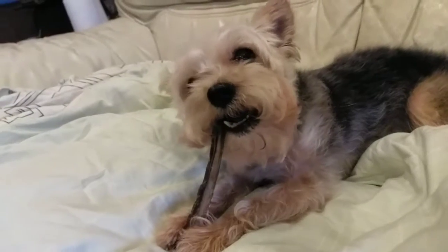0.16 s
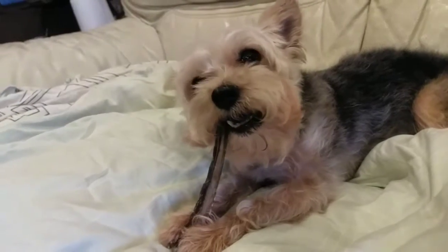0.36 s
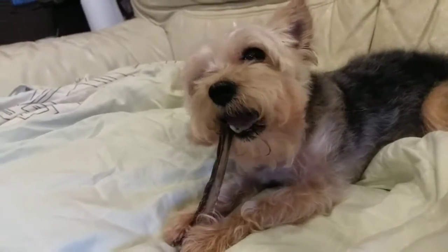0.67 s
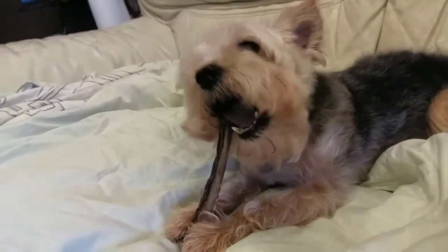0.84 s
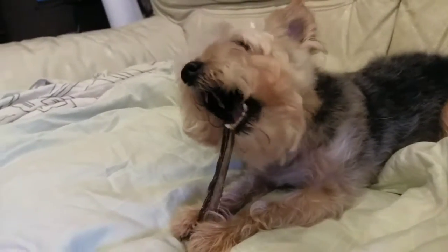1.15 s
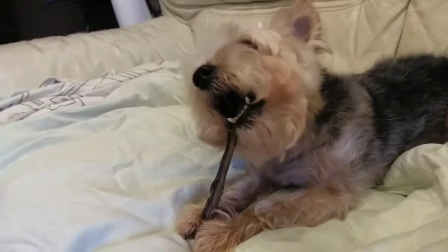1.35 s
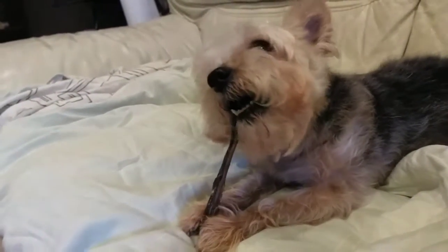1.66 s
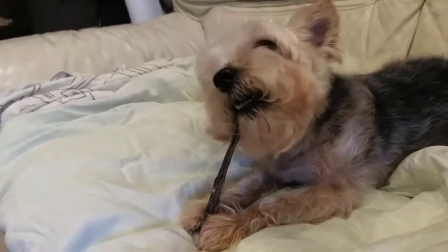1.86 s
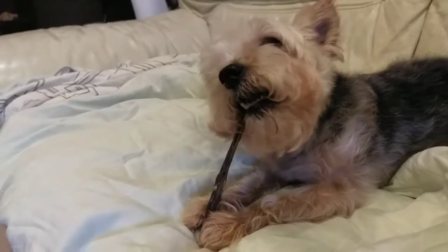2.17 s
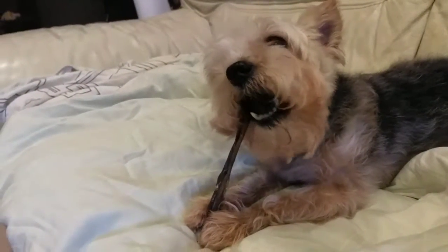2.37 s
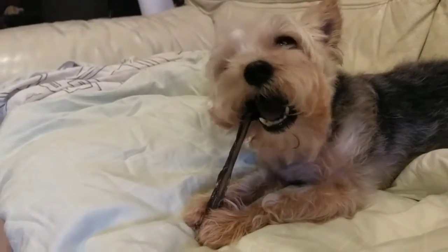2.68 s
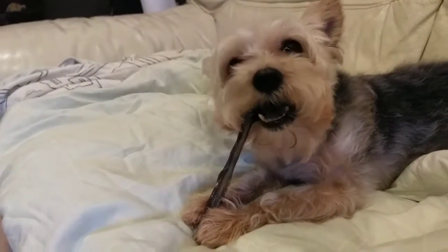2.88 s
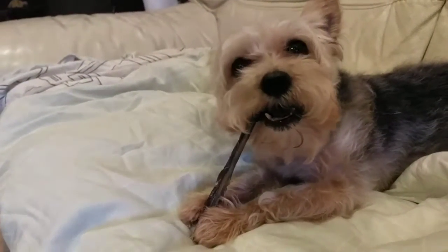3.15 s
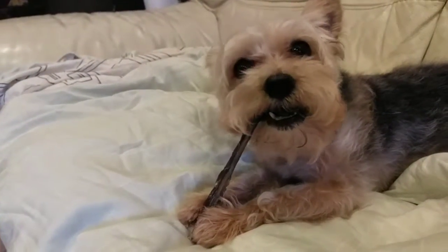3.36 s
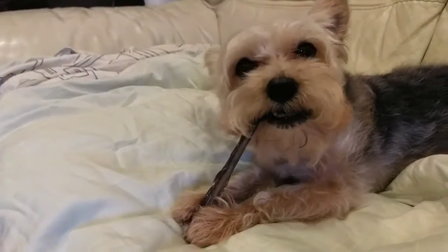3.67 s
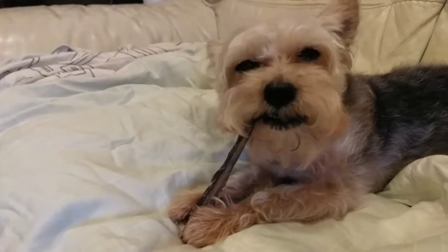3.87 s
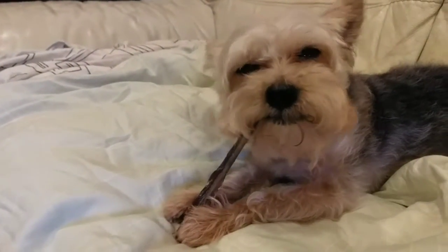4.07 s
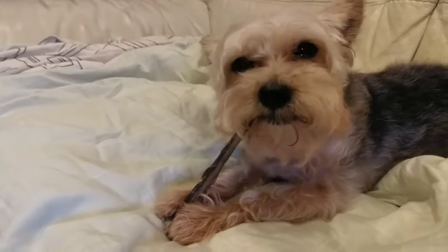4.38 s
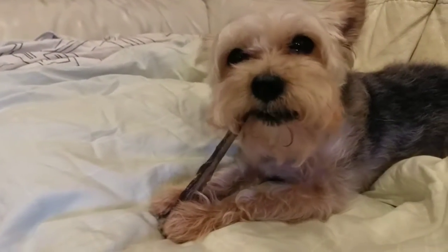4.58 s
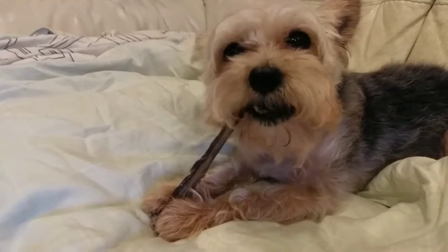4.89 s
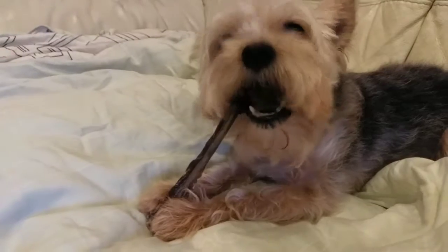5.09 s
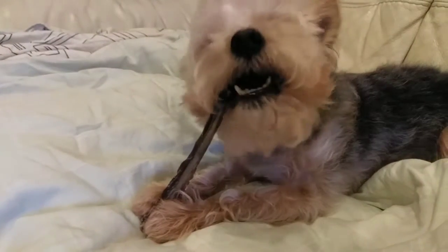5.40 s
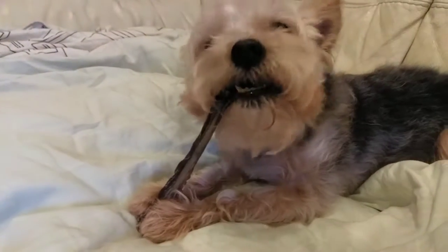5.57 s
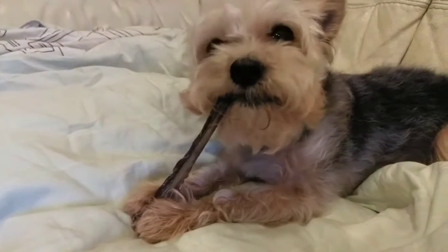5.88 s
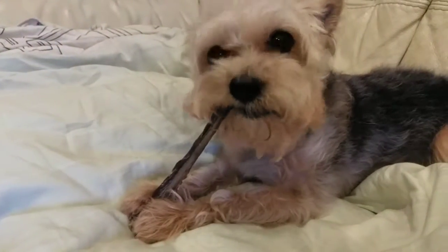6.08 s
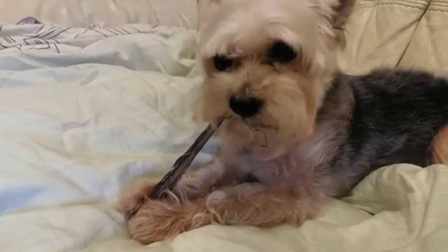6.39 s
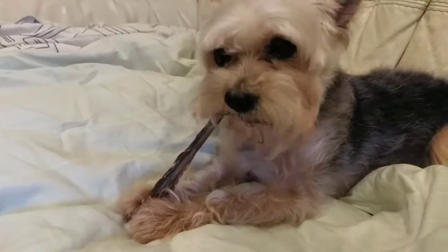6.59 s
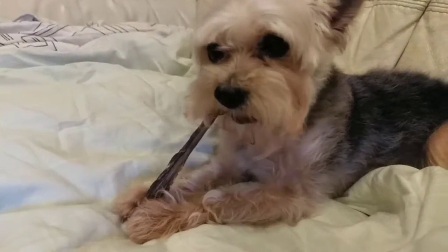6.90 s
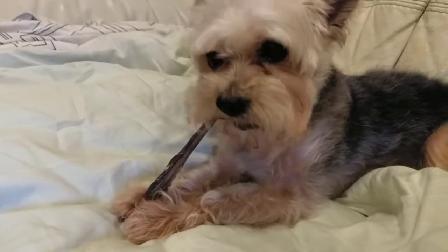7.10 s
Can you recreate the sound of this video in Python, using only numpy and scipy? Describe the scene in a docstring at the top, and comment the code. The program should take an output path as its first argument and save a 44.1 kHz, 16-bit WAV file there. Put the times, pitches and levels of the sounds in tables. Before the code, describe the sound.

A small dog gnaws a hard dried chew close to the microphones in a quiet, lively room. A tight cluster of brittle cracks comes first, then a spaced second bout, then a small third one. Wet lip clicks and saliva crackle run between. A single dry tick falls on the left. Faint hiss, low hum and a thin high whine lie beneath.

```python
"""A small dog gnaws a dried chew stick on a bed in a quiet, live room, close to two microphones.
Its teeth crack the stick in three bouts: each crack is a short ring, a dull knock with a thud, a harder clack
and a splintering snap, built from damped modes and noise, with scatter nearby and a room tail.
Wet mouth crackle made of random pops runs throughout and swells in smacks; one dry tick falls near the left
microphone; shaped noise makes a faint hiss and hum, and a thin electrical whine lies over them."""
import sys
import numpy as np
from scipy import signal
from scipy.fft import rfft, irfft, next_fast_len
from scipy.io import wavfile

SR = 44100
rng = np.random.default_rng(int(sys.argv[2]) if len(sys.argv) > 2 else 0)


def log_audio(samples):
    """Write samples as a 16-bit WAV file to the path given in sys.argv[1]."""
    # one column per channel
    frames = np.atleast_2d(samples).T
    # limit to full scale, then quantise
    limited = np.clip(frames, -1, 1)
    pcm = np.round(limited * 32767).astype(np.int16)
    wavfile.write(sys.argv[1], SR, pcm)


N = 319680

# broad colour of the breaking surface: f/Hz, relative level/dB
SNAP_COLOUR = [(1500, -4), (3200, -2), (4400, -21), (5100, 1), (6000, 3), (7500, 11), (8900, 8.5),
               (9700, -10), (11000, -45)]


def amp(db):
    """Decibels to gain."""
    return 10 ** (np.asarray(db) / 20)


def unit(x):
    """Scale to rms 1."""
    return x / np.sqrt(np.mean(x ** 2) + 1e-20)


def along(points, hz):
    """Interpolate (f/Hz, value) points on a log frequency axis."""
    f, v = np.transpose(points)
    return np.interp(np.log(hz + 1), np.log(f + 1), v)


def filtered(x, response):
    """x times a response of frequency, zero-padded against wrap-around."""
    n = x.shape[-1]
    m = next_fast_len(n + 4096)
    return irfft(rfft(x, m) * response(np.fft.rfftfreq(m, 1 / SR)), m)[..., :n]


def coloured(x, spectrum):
    """x through a zero-phase (f/Hz, gain/dB) spectrum."""
    return filtered(x, lambda hz: amp(along(spectrum, hz)))


def narrow(hz, width_hz):
    """A wavering tone: narrow noise of rms 1."""
    return unit(filtered(rng.standard_normal(N), lambda f: 1 / (1 + ((f - hz) / width_hz) ** 2)))


def add(track, s, sound):
    """Mix a stereo sound into the track at time s."""
    part = track[:, max(round(s * SR), 0):][:, :sound.shape[-1]]
    part += sound[:, :part.shape[-1]]


def later(x, lag_s=0.00032):
    """Sound reaches the right microphone a moment after the left."""
    return filtered(x, lambda hz: np.exp(-2j * np.pi * hz * lag_s))


def background(hiss_db=-48.0, tilt_db=0.65, hum_db=-55.5):
    """Steady air noise, its left-right likeness set per frequency, and a low wavering hum."""
    # air noise colour: f/Hz, relative level/dB per Hz
    hiss_colour = [(20, 4), (55, -5), (100, -9.5), (300, -11), (450, -12.5), (580, -16.5), (760, -11.5),
                   (1000, -17.5), (1350, -13), (1650, -19.5), (2150, -5.5), (2600, -21), (3400, -39.5),
                   (4400, -38.5), (8700, -38.5), (10000, -42), (11000, -60)]
    # left-right likeness of the air noise: f/Hz, correlation/1
    likeness = [(25, 0.84), (60, 0.2), (130, 0.029), (270, 0.17), (560, 0.83), (1180, 0.72), (2400, 0.017),
                (11000, 0.018)]

    def turn(hz):
        """Mid-side angle that gives the likeness."""
        return np.arccos(np.clip(along(likeness, hz), 0, 1)) / 2

    a, b = coloured(rng.standard_normal((2, N)), hiss_colour)
    mid = filtered(a, lambda hz: np.cos(turn(hz)))
    side = filtered(b, lambda hz: np.sin(turn(hz)))
    air = amp([[hiss_db + tilt_db], [hiss_db - tilt_db]]) * unit(np.array([mid + side, mid - side]))
    hum = amp(hum_db) * narrow(hz=54.9, width_hz=7.7)
    return air + hum


def whine(hz=5778, drift_hz=8, start_db=-82, rise_db=5.5, rise_s=(6.25, 6.7), right_db=0):
    """A thin electrical tone: a sine of slightly drifting pitch that swells once, late on."""
    pitch_hz = hz + drift_hz * narrow(hz=0, width_hz=5.9)
    level_db = start_db + np.interp(np.arange(N) / SR, rise_s, [0, rise_db])
    return amp([[0], [right_db]]) * amp(level_db) * np.sin(2 * np.pi * np.cumsum(pitch_hz) / SR)


def grit(t):
    """About a millisecond of broad crackle as the surface gives way; energy 1."""
    u = t / .0007
    x = coloured(rng.standard_normal(len(t)), SNAP_COLOUR) * u * np.exp(-u)
    return x / np.linalg.norm(x)


def mouth(right_db=-8, pops_per_s=1400, rest_db=-78, click_gain_db=4):
    """Saliva films burst at random and merge into a wet rustle that swells with each smack; a few click singly."""
    # saliva pops: f/Hz, relative level/dB
    saliva_colour = [(1500, -22), (3000, -6), (4400, -27), (6000, -4), (8600, 8), (9800, -11), (11000, -56)]
    # smacks of tongue and lips: middle t/s, length/s, crackle level/dB
    smacks = [(1.207, 0.25, -68), (1.56, .2, -74), (1.687, 0.091, -54.5), (3.557, 0.11, -73.5),
              (3.74, 0.16, -70), (4.294, 0.15, -70), (5.28, 0.07, -64), (5.78, .08, -68), (6.0, .12, -73),
              (6.31, 0.083, -69)]
    # single wet lip clicks: t/s, peak level before click_gain_db/dB
    lip_clicks = [(1.1283, -52), (1.2496, -52), (1.4167, -47.5), (1.5559, -52), (3.7818, -53), (4.654, -51),
                  (5.2729, -56), (5.2959, -52), (5.7778, -47)]
    t = np.arange(N) / SR
    sizes = amp(4 * rng.standard_normal(N))
    pops = (rng.random(N) < pops_per_s / SR) * rng.choice([-1, 1], N) * sizes
    level = amp(rest_db) + sum(amp(db) * np.exp(-(2 * (t - s) / length) ** 2) for s, length, db in smacks)
    crackle = np.array([level * unit(coloured(pops, saliva_colour))])
    for s, db in lip_clicks:
        click = grit(t[:SR // 50])
        add(crackle, s, amp(db + click_gain_db) * click[None] / np.abs(click).max())
    return np.concatenate([crackle, amp(right_db) * later(crackle)])


def burst(t, hz, swell_s):
    """A heavily damped resonance: its envelope swells to 1 and dies within a few cycles."""
    return t / swell_s * np.exp(1 - t / swell_s) * np.sin(2 * np.pi * hz * t)


def ringing(modes, t, ratio=0.97):
    """Damped modes, their frequencies scaled by ratio, struck a little differently by every bite."""
    chance = rng.standard_normal((len(modes), 2)) * [1, .012]  # level/dB, detune/1
    out = np.zeros(len(t))
    for k, ((hz, db, t60), (more_db, detune)) in enumerate(zip(modes, chance)):
        decay = amp(db + more_db - 60 * t / t60)
        out += (-1) ** k * decay * np.sin(2 * np.pi * hz * ratio * (1 + detune) * t)
    return out


def splinter(t, swell_s=0.00076):
    """Fibres tear: a few treble resonances swell at random strengths; energy 1."""
    # treble resonances before random spread: f/Hz, relative level/dB
    fibre_modes = [(3100, -8), (5200, -7), (6300, -2), (7400, 3.5), (8200, -1), (8800, 4), (9300, -7.5)]
    x = np.zeros(len(t))
    for hz, db in fibre_modes:
        late_s, more_db, detune = rng.uniform(0, .0008), rng.normal(0, 3.5), rng.normal(0, .025)
        x += amp(db + more_db) * burst(np.maximum(t - late_s, 0), hz * (1 + detune), swell_s)
    return x / np.linalg.norm(x)


def nearby(delay_s=.001, life_s=0.0068):
    """Scatter from the bed and the sofa back: decaying noise, cut off after a thirtieth of a second."""
    # soft bedding soaks up treble: f/Hz, gain/dB
    scatter_colour = [(200, -12), (460, 12), (1200, 4.5), (2100, 1), (3000, 1.5), (4500, 1.5), (9000, -2.5)]
    t = np.arange(SR // 30) / SR
    scatter = rng.standard_normal((2, len(t))) * (t > delay_s) * np.exp(-t / life_s)
    return coloured(scatter / np.linalg.norm(scatter, axis=1, keepdims=True), scatter_colour)


def scattered(x):
    """The scatter of x around both microphones, as strong as x itself."""
    y = signal.fftconvolve([x], nearby(), axes=1)
    return y * np.linalg.norm(x) / np.linalg.norm(y, axis=1, keepdims=True)


def walls(delay_s=0.019):
    """The room answers after a gap with clumps of echoes; its treble dies first."""
    # reverberation time: f/Hz, t60/s
    room_t60 = [(200, 1), (700, 0.99), (2100, 1), (4000, 0.67), (9000, 0.45)]
    # room tail colour: f/Hz, gain/dB
    room_colour = [(200, 2), (430, 1), (600, 9.5), (780, 6.5), (1100, 1.5), (1750, -5), (2150, -4.5),
                   (2600, -1), (3500, -3.5), (8500, -8.5)]
    hz, t, z = signal.stft(rng.standard_normal((2, SR)), SR, nperseg=256)
    clumps_db = 2.7 * rng.standard_normal(len(t)) * np.exp(-t / .3)
    decay_db = -60 * t / along(room_t60, hz)[:, None]
    tail = signal.istft(z * amp(clumps_db + decay_db), SR, nperseg=256)[1]
    tail = coloured(tail / np.linalg.norm(tail[0]), room_colour)
    return np.pad(tail, ((0, 0), (round(delay_s * SR), 0)))


def cracks(fibre_db=15, grit_db=13, shade_db=-18, knock_right_db=2, near_left_db=-6, room_right_db=-2):
    """Each crack rings, knocks, clacks and snaps; the right microphone is shaded from all but the knock."""
    # teeth cracking the stick: t/s, ring/dB, knock/dB, clack/dB, snap/dB, share sent to the surroundings/dB
    bites = [ (1.6311, -33, -73, -61, -24.5, -16), (1.6332, -14, -51, -39, -33, -5.5),
             (1.6456, -20.5, -50, -44, -40, -5), (1.6725, -25, -56, -52, -43, -7),
             (1.7140, -4.5, -35, -14, -20, -18), (1.7168, -10, -48, -33, -53, 3.5),
             (1.8925, -8, -24.5, -25, -30, -9), (1.9019, -12.5, -48, -30, -41, -5.5),
             (1.9507, -17.5, -32, -35, -46, -8.5), (2.0233, -28.5, -60, -52, -53, 1.5),
             (3.7028, -22, -27.5, -24.5, -35, -18.5), (3.7058, -18.5, -27.5, -41, -43, -5),
             (3.8498, -9.5, -18.5, -28, -26, -7.5), (4.1024, -4, -19.5, -18, -21, -10.5),
             (4.2880, -29, -39, -38.5, -52, -2), (4.3066, -28, -39, -45, -47, -8),
             (4.4013, -18.5, -30, -28, -34.5, -8), (4.4318, -15, -31.5, -27, -40.5, -7),
             (5.5710, -34, -57, -49, -72, -11), (5.75, -33, -60, -50, -62, -9),
             (5.8223, -20, -22, -19, -27.5, -13), (5.8353, -13.5, -51, -30, -43, -7),
             (6.3345, -35, -45, -48, -59, -3), (6.6570, -31, -56, -45, -65, -7), ]
    # dull modes of jaw and stick: f before pitch ratio/Hz, relative level/dB, t60/s
    knock_modes = [(195, -9, 0.02), (447, -3, 0.039)]
    # harder modes around the ring: f before pitch ratio/Hz, relative level/dB, t60/s
    clack_modes = [(1078, 4, 0.0095), (1380, 5.5, 0.01), (1820, 6, 0.0044), (2680, -6.5, 0.0035)]
    hard_bite_db = -8  # ring level of a hard bite
    knock_ratio, knock_sag_per_db = 1.025, .016  # beyond a hard bite the knock drops in pitch
    hard_thud_db, thud_per_db = 0, 0.58  # thud over knock; grows with force
    full_db, full_per_db = 3.5, .42  # the more it knocks rather than rings, the fuller the snap's lower treble
    nearby_db, spray_db = 0, 3.5  # nearby scatter over the room's share; treble thrown into the room
    ring_hz, ring_swell_s, swell_per_db = 2127, 0.00082, 0.05  # a harder bite rings longer
    out, t = np.zeros((2, N)), np.arange(SR // 20) / SR
    for s, ring_db, knock_db, clack_db, snap_db, room_db in bites:
        force_db = ring_db - hard_bite_db
        ratio = knock_ratio - knock_sag_per_db * max(force_db, 0)
        thud_db = knock_db + hard_thud_db + thud_per_db * force_db
        lower_db = full_db + full_per_db * (knock_db - ring_db)
        near_db = room_db + nearby_db

        ring = amp(ring_db) * burst(t, ring_hz, ring_swell_s * np.exp(swell_per_db * force_db))
        knock = amp(knock_db) * ringing(knock_modes, t, ratio) * (1 - np.exp(-t / 0.0019))
        thud = amp(thud_db) * burst(t, hz=759, swell_s=0.00059)
        clack = amp(clack_db) * ringing(clack_modes, t) * (1 - np.exp(-t / 0.00049))
        body = ring + thud + clack
        lower_treble = [(3400, 0), (4800, lower_db), (6200, lower_db), (8000, 0.0081)]  # f/Hz, gain/dB
        tearing = amp(fibre_db) * splinter(t) + amp(grit_db) * grit(t)
        snap = amp(snap_db) * coloured(tearing, lower_treble)

        left = knock + body + snap
        right = amp(knock_right_db) * knock + amp(shade_db) * later(body + snap)
        add(out, s, np.array([left, right]))
        add(out, s, amp([[near_db + near_left_db], [near_db]]) * scattered(body + snap))
        # the room gathers the snap from all directions, evening out its resonances; a stronger crack throws more
        spray = coloured(signal.unit_impulse(len(t), SR // 1000), SNAP_COLOUR)
        spray = coloured(spray / np.linalg.norm(spray), lower_treble)
        to_room = amp(room_db) * body + amp((snap_db + ring_db) / 2 + spray_db) * spray
        add(out, s, amp([[0], [room_right_db]]) * signal.fftconvolve([to_room], walls(), axes=1))
    return out


def tick(right_db=-22):
    """A single sharp pulse, too close and small to wake the room."""
    # dry tick beside the left microphone: t/s, peak level/dB
    ticks = [(5.4236, -4.5)]
    # pulse colour: f/Hz, relative level/dB
    tick_colour = [(60, -4.5), (180, -11.5), (300, -15), (700, -3.5), (1400, 0), (2200, 4), (3500, -10),
                   (5500, -11.5), (10000, -11), (11200, -21.5)]
    out = np.zeros((2, N))
    pulse = coloured(signal.unit_impulse(SR // 50, "mid"), tick_colour)
    for s, db in ticks:
        add(out, s - len(pulse) / SR / 2, amp([[db], [db + right_db]]) * pulse / pulse.max())
    return out


def scene():
    """The chewing dog in its room."""
    return background() + whine() + mouth() + cracks() + tick()


def record(dry, ceiling=.95, top_hz=11250):
    """The microphones dip slightly above the ring; the loudest peaks round off; a steep low-pass ends the band."""
    notch = [(3200, 0.98), (4400, -1.4), (5200, 0.53)]  # f/Hz, gain/dB
    x = coloured(dry, notch)
    x = x / (1 + (x / ceiling) ** 8) ** (1 / 8)
    return filtered(x, lambda hz: 1 / (1 + (hz / top_hz) ** 70))


dry = scene()
out = record(dry)
log_audio(out)
```